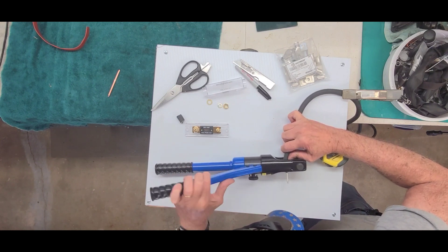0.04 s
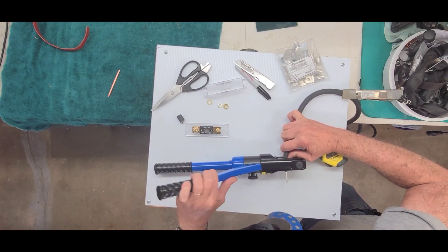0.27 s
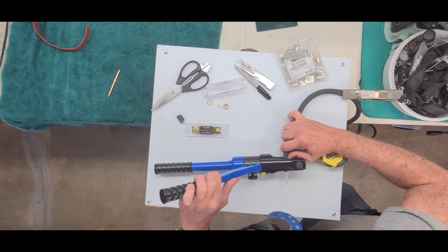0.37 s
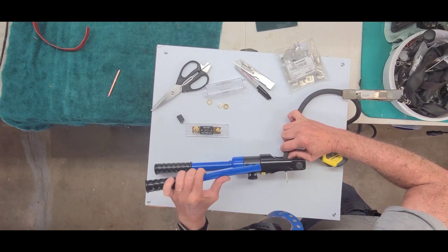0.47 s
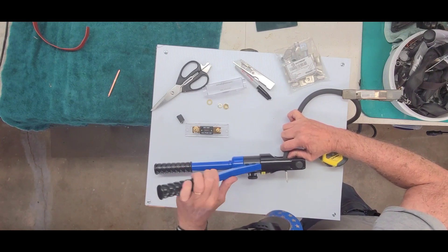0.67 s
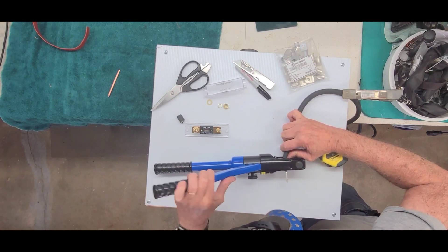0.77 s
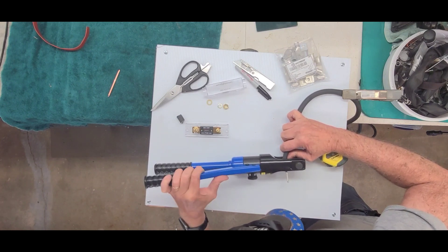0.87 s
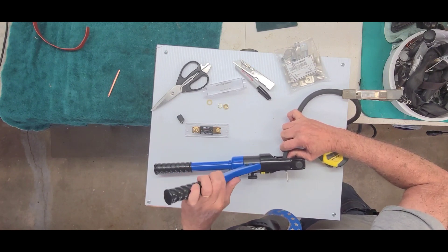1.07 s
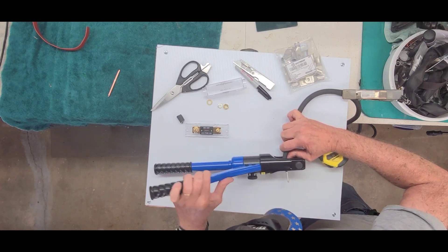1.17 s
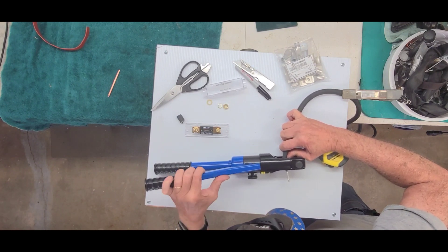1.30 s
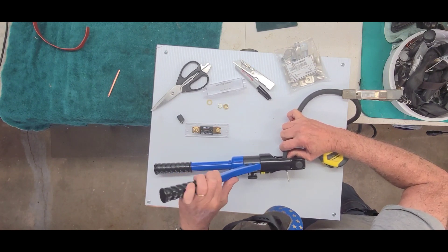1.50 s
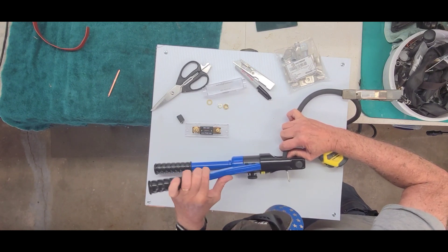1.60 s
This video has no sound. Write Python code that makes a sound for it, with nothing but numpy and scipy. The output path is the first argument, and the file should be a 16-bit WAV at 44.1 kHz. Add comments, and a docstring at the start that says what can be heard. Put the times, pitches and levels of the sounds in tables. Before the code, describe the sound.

Close to the microphone, a hand-pumped hydraulic crimper clacks through four quick strokes, thudding on a workbench. Between them the tool rocks, ticks and scrapes. One quiet lift follows, over a low rumble in a small workshop.

```python
"""A hand-pumped hydraulic crimper on a bench in a small workshop, close to a pair of microphones.
First the handle lifts: the tool rocks and scrapes on the bench, the pivot rasps, oil hisses in a valve.
Loose parts tick, then the push ends with the handle clacking on its stop, and a thud runs through
the bench, treble first, bass last. Four pushes come, about 2.6 a second, over a low bench rumble
and faint room noise. A last, quiet lift follows and the rumble eases."""
import sys
import numpy as np
from scipy import signal
from scipy.fft import rfft, irfft
from scipy.io import wavfile
from scipy.ndimage import uniform_filter1d

SR = 44100
rng = np.random.default_rng(int(sys.argv[2]) if len(sys.argv) > 2 else 0)


def put_to_file(sound):
    """Save the sound as 16-bit audio at rate SR, in the file named by the first command-line argument."""
    columns = np.atleast_2d(sound).T  # one column per channel
    safe = np.clip(columns, -1, 1)
    whole_steps = np.round(safe * 32767)
    wavfile.write(sys.argv[1], SR, whole_steps.astype(np.int16))


N = 72765
T = np.arange(N) / SR

# handle meets its stop: start_s, clank_db, snap_db, chatter_decay_s
STOP_CLACKS = [(.1772, -38.5, -54, 0.0082), (0.5673, -40, -38.5, 0.0049), (0.9441, -37.5, -34.5, 0.0045),
               (1.3092, -41, -53.5, 0.01), (1.3163, -37.5, -53, 0.0028)]
# play in the linkage: start_s, clank_db, snap_db, crack_db
LINKAGE_TICKS = [(0.0727, -45.5, -71, -56.5), (.2922, -46, -60, -79), (0.3502, -38, -62, -68),
                 (0.3652, -48, -66, -68), (0.68, -59.5, -64, -86), (0.689, -57, -71, -83),
                 (0.7429, -43.5, -63, -77), (0.757, -42, -65, -73), (0.8256, -46, -53, -47),
                 (0.831, -74, -66, -47.5), (1.036, -43.5, -55, -71), (1.087, -41.5, -42, -43),
                 (1.1, -38.5, -47, -65), (1.107, -44, -47, -69), (1.507, -43.5, -59, -84)]
# hollow knocks of the tool body: start_s, level_db
BODY_KNOCKS = [(0.018, -43.5), (0.3524, -33), (0.4651, -50.5), (0.545, -61), (0.634, -55), (.709, -48.5),
               (0.7489, -35), (.757, -39), (0.825, -50), (0.863, -46.5), (1.059, -39.5), (1.0709, -33.5),
               (1.0995, -40), (1.123, -55), (1.188, -46), (1.311, -43.5), (1.356, -52), (1.5, -44.5),
               (1.585, -51)]
# tool modes, from dull body to sharpest contact: pitch_hz, t60_s, gain_db
HOLLOW_MODES = [(1072, .014, -9.5), (1236, 0.015, -3.5), (1375, 0.017, 0.5), (1550, .016, -2)]
CLANK_MODES = [(1047, 0.0095, -1), (1461, 0.021, 1), (2478, 0.01, 5), (2924, 0.0059, 7), (3686, 0.015, -5),
               (4010, 0.011, -1), (4770, 0.0051, -6.5)]
SNAP_MODES = [(5286, 0.0076, 3.5), (6085, 0.0067, 6.5), (6465, 0.0027, 4.5), (9500, 0.0028, -8),
              (11600, 0.0012, -2.5), (15000, 0.0042, -18)]
CRACK_MODES = [(1760, 0.0036, 10.5), (5260, 0.0011, -1), (8150, 0.0012, -0.5), (11600, .002, -9.5),
               (14600, .002, -10)]

# the bench takes the push: start_s, bass_db, knock_db
BENCH_THUDS = [(.178, -29, -34.5), (0.57, -28, -33), (0.948, -25, -30), (1.31, -28.5, -30.5)]
# the tool rocks on the bench: start_s, level_db
TOOL_ROCKS = [(-.04, -45), (0.307, -30.5), (.36, -37.5), (0.7, -32.5), (1.048, -25), (1.097, -37),
              (1.463, -51.5)]
# bench top modes: pitch_hz, t60_s, push_gain_db, rock_gain_db
BENCH_MODES = [(69.55, 0.47, -43, 5), (88.56, 0.26, 2.5, 9), (124.7, .14, -12.5, -2),
               (186, 0.14, -20, -10.5), (245.5, 0.13, 0.5, -17), (278, 0.26, -6.5, -6.5),
               (371.6, 0.062, -5.5, -8), (398.1, 0.16, -9, -8), (481.7, 0.069, -2, 0.5),
               (537, 0.11, -12, -29), (676.5, 0.064, -17, -36), (1026, 0.059, -15, -31)]

# handle lifts: rasp_peak_s, rasp_rise_s, scrape_db, rasp_db, oil_db
LIFT_STROKES = [(.004, 0.033, -41.5, -49.5, -63.5), (0.352, 0.013, -37, -44, -56),
                (0.746, 0.012, -37.5, -44.5, -52), (1.101, 0.021, -31.5, -36.5, -43.5),
                (1.499, 0.011, -45, -58.5, -91)]
# tone of the bench scrape, pivot rasp and oil hiss: frequency_hz, gain_db
SCRAPE_SPECTRUM = [(90, 1.5), (190, -2), (280, 2.5), (520, -1.5), (800, -21), (1100, -12), (1400, -3),
                   (1650, -9), (1950, -28.5), (4000, -46.5)]
RASP_SPECTRUM = [(900, -7.5), (1900, -7), (2700, 1), (3500, -2), (4800, -9.5), (6200, -6), (7600, -19),
                 (10000, -25.5), (15500, -20)]
OIL_SPECTRUM = [(7000, -53), (10000, -29), (11000, 5), (12900, -22), (13700, -5), (15500, -37)]
# the rubbed pivot sings: pitch_hz, width_hz
PIVOT_RINGS = [(3270, 13), (3430, 25), (3560, 70), (6250, 56)]
# whistles of the oil valve: pitch_hz, width_hz, above_hiss_db
VALVE_WHISTLES = [(12770, 70, 4), (14900, 150, 6)]
# short slips of the linkage, some at the stop: peak_s, level_db
LINKAGE_SLIPS = [(0.179, -48.5), (0.418, -47), (.566, -49), (.845, -55.5), (0.946, -42), (1.308, -54.5),
                 (1.361, -57.5), (1.482, -55)]

# tone of the workshop's reverberation: frequency_hz, gain_db
REVERB_SPECTRUM = [(60, -3.5), (200, -13), (500, -10.5), (1400, -7.5), (3000, -6.5), (6200, -7.5),
                   (9000, -4), (15000, -9)]
# low rumble of the bench: time_s, level_db
RUMBLE_LEVELS = [(0, -45.5), (1.42, -46.5), (1.6, -52.5)]
# tone of the rumble and of the room noise: frequency_hz, gain_db
BENCH_RUMBLE_SPECTRUM = [(25, -41.5), (45, -4), (70, 6.5), (110, -5), (180, -14), (280, -19), (500, -24.5),
                         (800, -32.5), (2000, -62.5)]
ROOM_NOISE_SPECTRUM = [(100, -22.5), (500, -8.5), (800, -18), (1400, -31), (2000, -27.5), (3200, -27.5),
                       (6000, -31), (8000, -48), (15000, -34)]
# weight of the difference between the microphones: frequency_hz, gain_db
STEREO_WIDTH = [(60, -16), (250, -14), (600, -3), (1300, -6), (2600, -.5), (15000, -.5)]


def metal_contacts():
    """The handle clacks on its stop, the loose linkage ticks and the tool body knocks hollowly."""
    tick_decay_s, knock_decay_s = 0.0053, 0.00087
    out = np.zeros(N)
    for start, clank_db, snap_db, decay_s in STOP_CLACKS:
        out += strike(start, clank_db, CLANK_MODES, decay_s)
        out += strike(start, snap_db, SNAP_MODES, decay_s)
    for start, clank_db, snap_db, crack_db in LINKAGE_TICKS:
        out += strike(start, clank_db, CLANK_MODES[2:], tick_decay_s)
        out += strike(start, snap_db, SNAP_MODES, tick_decay_s)
        out += strike(start, crack_db, CRACK_MODES, tick_decay_s)
    return out + sum(strike(start, db, HOLLOW_MODES, knock_decay_s) for start, db in BODY_KNOCKS)


def strike(start, db, modes, decay_s):
    """A contact and its brief chatter ring the modes; db is the level of the loudest 3 ms."""
    t = T[:SR // 10]
    chatter = rng.standard_normal(len(t)) * np.exp(-t / decay_s) / np.sqrt(SR * 0.0015)
    force = (t == 0) + chatter
    hit = signal.fftconvolve(force, ring_modes(t, modes))
    low_cut = signal.butter(2, 0.83 * modes[0][0], "high", fs=SR, output="sos")
    hit = signal.sosfilt(low_cut, hit)
    hit /= np.sqrt(uniform_filter1d(hit ** 2, size=132, mode="constant").max())
    return amp(db) * np.r_[np.zeros(int(max(start, 0) * SR)), hit, np.zeros(N)][:N]


def bench_thuds():
    """Pushes and rocking bend the bench top; after a push, low modes arrive later and build slower."""
    bass_below_hz, push_build_cycles, rock_build_s = 150, 0.73, 0.019
    out = np.zeros(N)
    for k, (hz, t60, push_db, rock_db) in enumerate(BENCH_MODES):
        delay_s = 0.01817 * (100 / hz) ** 0.573
        for start, bass_db, knock_db in BENCH_THUDS:
            t = np.maximum(T - start - delay_s, 0)
            gain = amp(push_db + (bass_db if hz < bass_below_hz else knock_db))
            out += gain * ring(t, hz, t60) * np.expm1(-t * hz / push_build_cycles)
        for start, db in TOOL_ROCKS:
            t = np.maximum(T - start, 0)
            out += (-1) ** k * amp(db + rock_db) * ring(t, hz, t60) * np.expm1(-t / rock_build_s)
    return out


def handle_lifts():
    """The tool scrapes on the bench, the pivot rasps and sings, and oil whistles through the valve."""
    scrape = unit(colour(stick_slip(), SCRAPE_SPECTRUM))
    friction = stick_slip()
    singing = sum(resonance(friction, hz, width) for hz, width in PIVOT_RINGS)
    rasp = unit(unit(colour(friction, RASP_SPECTRUM)) + amp(-16) * singing)
    hiss = unit(colour(noise(), OIL_SPECTRUM))
    whistles = sum(amp(db) * resonance(noise(), hz, width) for hz, width, db in VALVE_WHISTLES)
    oil = unit(hiss + whistles)
    out = np.zeros(N)
    for peak, rise, scrape_db, rasp_db, oil_db in LIFT_STROKES:
        out += amp(scrape_db) * scrape * swell(peak - 0.0027, 1.59 * rise, fall_s=0.034)
        out += amp(rasp_db) * rasp * swell(peak, rise, fall_s=0.031)
        out += amp(oil_db) * oil * swell(peak + 0.0041, 0.76 * rise, fall_s=0.0077)
    return out


def linkage_slips():
    """Brief stick-slip rubs rasp and ring the tool's modes."""
    ringing = unit(through(stick_slip(), ring_modes(T, CLANK_MODES)))
    rasp = unit(colour(stick_slip(), RASP_SPECTRUM))
    envelope = sum(amp(db) * swell(peak, rise_s=0.0048, fall_s=0.0095) for peak, db in LINKAGE_SLIPS)
    return unit(ringing + amp(2.5) * rasp) * envelope


def stick_slip(clicks_per_s=3500, spread_db=3):
    """Rubbing surfaces catch and let go in dense clicks of uneven size."""
    clicks = noise() * (rng.random(N) < clicks_per_s / SR)
    return clicks * amp(spread_db * np.minimum(rng.exponential(size=N), 3))


def workshop_reverb(x, low_t60_s=0.31, treble_t60_s=0.28, build_s=0.0018):
    """Diffuse reflections from the workshop, whose treble dies first."""
    white = noise()
    low = signal.sosfilt(signal.butter(2, 6000, fs=SR, output="sos"), white)
    tail = low * amp(-60 * T / low_t60_s) + (white - low) * amp(-60 * T / treble_t60_s)
    tail *= -np.expm1(-T / build_s)
    return through(x, colour(unit(tail) / np.sqrt(N), REVERB_SPECTRUM))


def background():
    """Low rumble of the handled bench over faint room noise."""
    rumble_db = np.interp(T, *np.array(RUMBLE_LEVELS).T)
    rumble = amp(rumble_db) * unit(colour(noise(), BENCH_RUMBLE_SPECTRUM))
    return rumble + amp(-67.5) * unit(colour(noise(), ROOM_NOISE_SPECTRUM))


def amp(db):
    """Decibels to gain."""
    return 10 ** (np.asarray(db) / 20)


def unit(x):
    """Scale to rms 1."""
    return x / np.sqrt(np.mean(x ** 2))


def noise():
    """White noise."""
    return rng.standard_normal(N)


def through(x, response):
    """Pass a signal through an impulse response."""
    return signal.fftconvolve(x, response)[:N]


def gain_curve(points):
    """Gain at each bin of a 2N-point FFT, from (frequency_hz, gain_db) points."""
    hz, db = np.array(points).T
    bins_hz = np.maximum(np.fft.rfftfreq(2 * N, 1 / SR), 1)
    return amp(np.interp(np.log(bins_hz), np.log(hz), db))


def colour(x, points):
    """Minimum-phase filter from (frequency_hz, gain_db) points."""
    cepstrum = irfft(np.log(gain_curve(points)))
    causal = np.r_[cepstrum[0], 2 * cepstrum[1:N]]
    return irfft(rfft(x, 2 * N) * np.exp(rfft(causal, 2 * N)))[:N]


def ring(t, hz, t60):
    """One damped mode."""
    return np.sin(2 * np.pi * hz * t) * np.exp(-np.log(1000) * t / t60)


def ring_modes(t, modes):
    """Damped modes ringing together with alternating signs."""
    return sum((-1) ** k * amp(db) * ring(t, hz, t60) for k, (hz, t60, db) in enumerate(modes))


def resonance(x, hz, width_hz):
    """One narrow mode driven by x, at rms 1."""
    return unit(through(x, ring(T, hz, t60=np.log(1000) / np.pi / width_hz)))


def swell(peak_s, rise_s, fall_s):
    """Exponential rise to a peak and fall from it."""
    return np.exp(np.minimum((T - peak_s) / rise_s, (peak_s - T) / fall_s))


def scene():
    """Tool and bench in the room; the paths to the two microphones differ in phase, mostly up high."""
    direct = metal_contacts() + bench_thuds() + handle_lifts() + linkage_slips()
    path_lag_s = 0.0013
    paths = 1j * np.sin(2 * np.pi * np.fft.rfftfreq(2 * N, 1 / SR) * path_lag_s)
    diffuse = amp(3) * workshop_reverb(direct) + background()
    side_spectrum = rfft(direct, 2 * N) * paths + rfft(diffuse, 2 * N)
    side = irfft(side_spectrum * gain_curve(STEREO_WIDTH))[:N]
    mid = direct + workshop_reverb(direct) + background()
    return np.array([amp(-1.1) * (mid + side), amp(-0.59) * (mid - side)])


def record(dry):
    """The recorder cuts the top steeply above 15.3 kHz."""
    return signal.sosfilt(signal.ellip(8, 0.2, 70, 15300, fs=SR, output="sos"), dry)


dry = scene()
out = record(dry)
put_to_file(out)
```